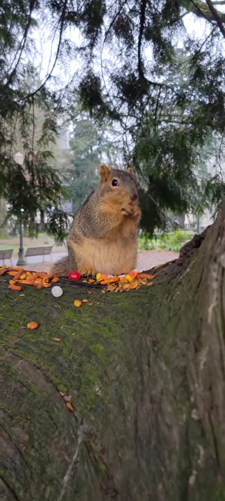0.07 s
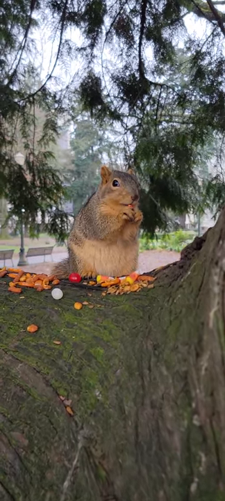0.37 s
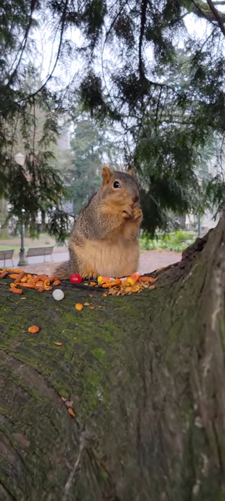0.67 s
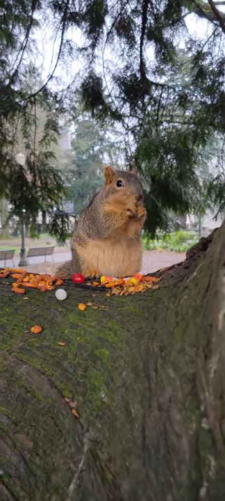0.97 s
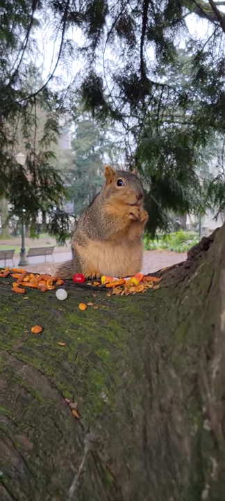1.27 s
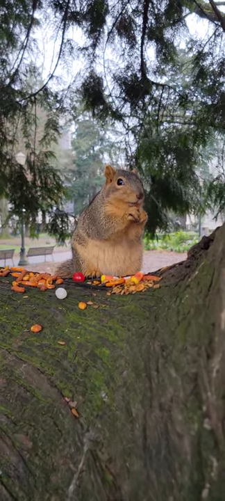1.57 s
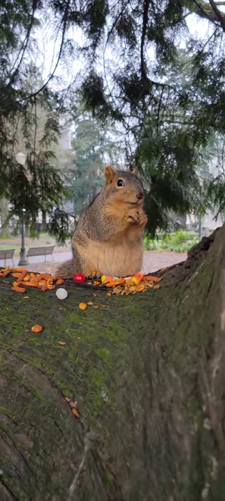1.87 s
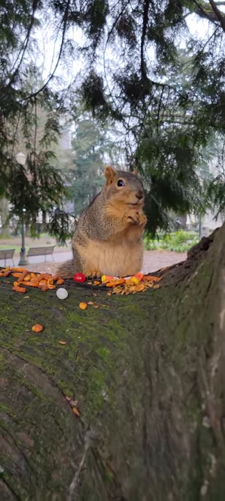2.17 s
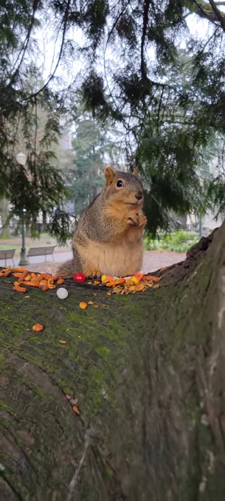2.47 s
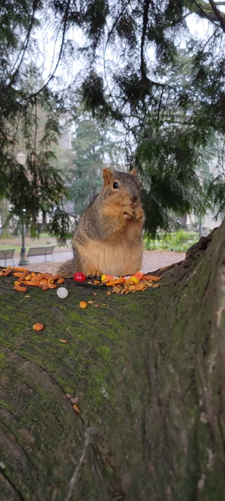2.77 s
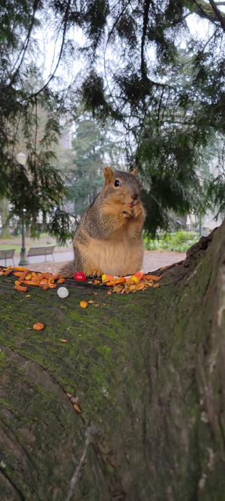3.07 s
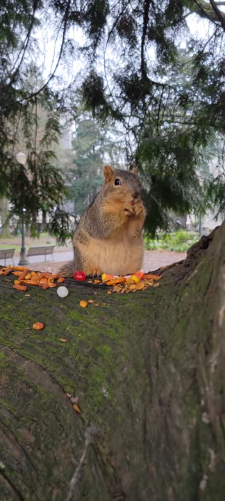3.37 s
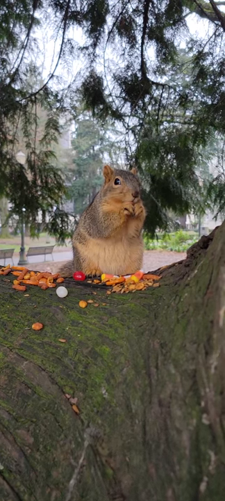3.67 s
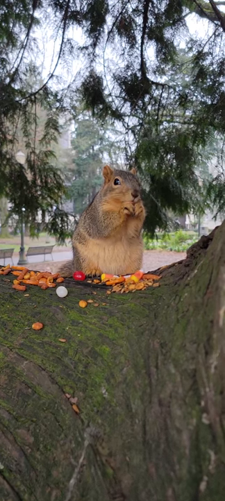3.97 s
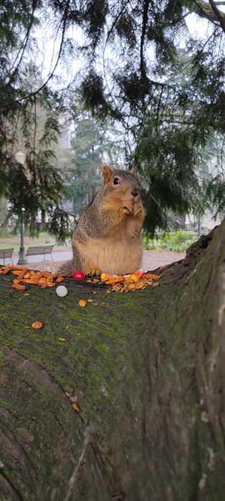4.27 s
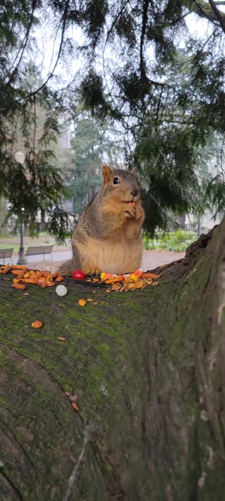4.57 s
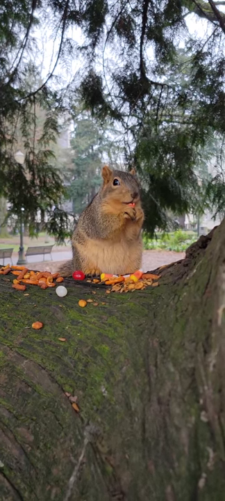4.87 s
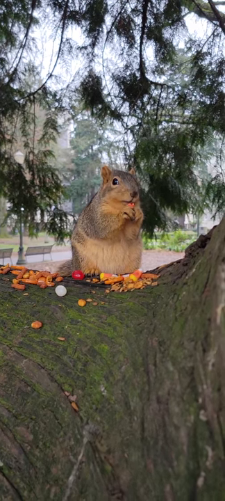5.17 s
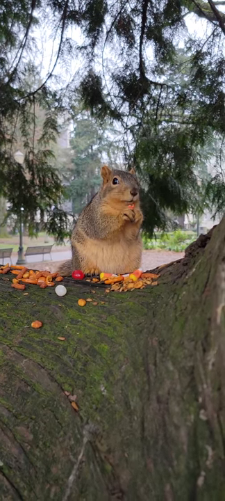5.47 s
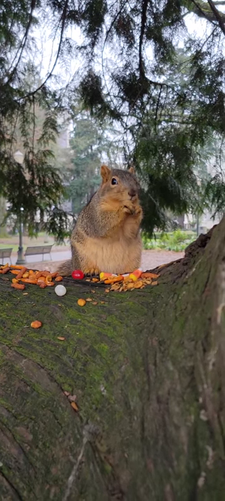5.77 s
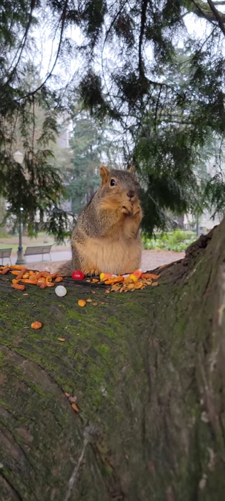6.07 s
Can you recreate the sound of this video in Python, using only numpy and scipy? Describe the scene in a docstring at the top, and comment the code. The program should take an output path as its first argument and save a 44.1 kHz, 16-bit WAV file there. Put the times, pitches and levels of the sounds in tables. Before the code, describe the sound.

A deep rumble of distant traffic fills a town park for the whole six seconds, gently swelling and dipping, with a low engine drone and a wash of tyres that slowly grows. Close by, a squirrel chews with tiny, scattered ticks, and a barely audible high rustle comes about once a second. A few short, soft, hollow notes sound far off between 2.3 and 3.5 seconds, and again from 5.2 to 5.7. From about 4.3 to 5.3 seconds the squirrel gnaws a hard nut in eight sharp, evenly spaced bites, each a crisp crack with a fine crumbling tail. The first four are dry and snapping, the last four a little softer and more hollow. Smaller chewing clicks follow until about 5.6 seconds, and the traffic carries on to the end.

```python
"""Traffic rumble swells and dips around a town park, with an engine drone and slowly growing tyre wash.
Close by, a squirrel on a tree trunk makes tiny chewing ticks. A faint, high rustle comes about once a
second, and soft hollow notes sound far off.
Then the squirrel gnaws a hard nut: eight sharp bites, each two quick fractures with a crumbling tail.
The first bites snap the dry shell, the later ones ring the hollow of mouth and paws."""
import sys
import numpy as np
from scipy import signal
from scipy.fft import rfft, irfft
from scipy.io import wavfile
from scipy.ndimage import uniform_filter1d

SR = 44100
rng = np.random.default_rng(int(sys.argv[2]) if len(sys.argv) > 2 else 0)


def waveform_to_disk(signal):
    """Save audio, clipped to [-1, 1], as 16-bit WAV at the path in sys.argv[1]."""
    frames = np.transpose(np.atleast_2d(signal))
    scaled = np.clip(frames, -1, 1) * 32767
    samples = np.round(scaled).astype(np.int16)
    wavfile.write(sys.argv[1], SR, samples)


N = 274302
T = np.arange(N) / SR


def undb(db):
    """Decibels to gain."""
    return 10 ** (np.asarray(db) / 20)


def unit(x):
    """Scale to rms 1."""
    return x / np.sqrt(np.mean(x ** 2) + 1e-24)


def pan(db):
    """Stereo gains for a left-minus-right level in dB; negative leans right."""
    return undb([[db / 2], [-db / 2]])


def add(out, x, start_s):
    """Mix x into out from start_s on."""
    i = int(np.clip(start_s * SR, 0, N - 1))
    out[..., i:i + x.shape[-1]] += x[..., :N - i]


def band(x, low_hz, high_hz, order=3):
    """Causal band-pass."""
    return signal.sosfilt(signal.butter(order, [low_hz, high_hz], "band", fs=SR, output="sos"), x)


def bins(x):
    """Frequencies of the spectrum of x."""
    return np.arange(x.shape[-1] // 2 + 1) * SR / x.shape[-1] + 1e-3


def along(hz, table):
    """Columns of a table, joined by straight lines over log frequency."""
    points, *columns = np.transpose(table)
    return [np.interp(np.log(hz), np.log(points), c) for c in columns]


def colour(x, table):
    """EQ x through points of freq_hz, gain_db."""
    return irfft(rfft(x) * undb(along(bins(x), table)[0]), x.shape[-1])


def ring(x, modes):
    """Pass x through parallel resonances of freq_hz, width_hz, gain_db."""
    f = bins(x)
    response = sum(undb(db) / (1 + 1j * (f * f - hz * hz) / (f * width)) for hz, width, db in modes)
    return irfft(rfft(x) * response, len(x))


def walk(rate_hz):
    """Smooth random drift with a spread near 1."""
    hold = int(SR / rate_hz)
    steps = np.repeat(rng.standard_normal(N // hold + 1), hold)
    return 1.28 * uniform_filter1d(uniform_filter1d(steps, hold), hold)[:N]


def grain_gains(count, grain_db, cap=4):
    """Random gains for a gritty texture: many small, a few large."""
    return undb(grain_db * np.minimum(rng.exponential(size=count), cap))


def whiten(burst):
    """Flatten a burst's broad spectrum; fade it out between a quarter and half of its length."""
    spectrum = rfft(burst)
    power = uniform_filter1d(np.abs(spectrum) ** 2, 15)
    fade = np.clip(2 - 4 * np.arange(len(burst)) / len(burst), 0, 1)
    return irfft(spectrum / np.sqrt(power + 1e-18), len(burst)) * fade


# Tone of the streets: freq_hz, gain_db
RUMBLE_EQ = [(20, -36), (30, -13.5), (42, -4), (55, 6), (65, 7.5), (78, 9), (90, 2.5), (108, -3), (128, 2),
             (150, -5.5), (185, -9.5), (240, -14), (330, -27.5), (600, -76)]
# Swells and dips of the traffic: time_s, level_db
RUMBLE_LEVELS = [(0, -38), (.5, -35.5), (1.2, -34), (1.95, -34.5), (2.34, -34.5), (2.44, -40), (2.55, -34),
                 (2.85, -36.5), (3, -36.5), (3.12, -34.5), (3.9, -35), (4.65, -33), (5.25, -33), (5.4, -35),
                 (5.9, -30.5), (5.98, -42), (6.1, -32.5)]


def traffic_rumble(drift_db=0.07):
    """Deep street rumble that swells and dips, a little to the right."""
    rumble = unit(colour(rng.standard_normal(N), RUMBLE_EQ))
    rumble /= np.sqrt(uniform_filter1d(rumble ** 2, SR // 4))  # many engines overlap and even out
    level_db = np.interp(T, *np.transpose(RUMBLE_LEVELS)) + drift_db * walk(8)
    return rumble * undb(level_db) * pan(-2.5)


# Pitch and level ride of one engine: time_s, firing_hz, level_db
ENGINE_RIDE = [(0, 103, -38.5), (1.2, 101.5, -42), (2.33, 103, -33), (2.45, 103, -37), (2.98, 108, -44),
               (3.1, 107, -33.5), (3.42, 106, -37.5), (3.899, 103, -38), (4.6, 108, -41.5), (5.1, 101, -41),
               (6.22, 103, -47.5)]


def engine_drone(waver_hz=3, throb_db=2.0, whine_hz=187.5, whine_db=-52):
    """An engine hums at its wavering firing rate, with a faint, low whine above it."""
    time_s, *columns = np.transpose(ENGINE_RIDE)
    firing_hz, level_db = (np.interp(T, time_s, c) for c in columns)
    phase = 2 * np.pi * np.cumsum(firing_hz + waver_hz * walk(22.007)) / SR
    drone = unit(np.sin(phase) * undb(throb_db * walk(19)))
    whine = unit(ring(rng.standard_normal(N), [(whine_hz, 3.4, 0)]))
    return (drone * undb(level_db) + whine * undb(whine_db)) * pan(-2.5)


# Tone of the far tyres: freq_hz, gain_db
WASH_EQ = [(150, 3), (280, -2), (420, -4.5), (520, -0.5), (900, 0), (1300, 0), (1600, -7), (2100, -13),
           (2700, -14.5), (4000, -26), (7500, -40.5), (9400, -50), (10400, -63.5), (12500, -56),
           (15600, -63), (16100, -78.5)]
# Their stereo image: freq_hz, left_minus_right_db, correlation
WASH_IMAGE = [(200, -1.5, 0.75), (389, -4.5, 0.4), (516, -6, 0.33), (1030, -2, -0.13), (1870, -2.5, 0.23),
              (2120, 0.5, -0.11), (7000, 1.5, -0.08), (9300, 8, -0.73), (15000, 17, -0.25)]


def tyre_wash(start_db=-40.5, rise_db_per_s=0.4451, flicker_db=0.66, hiss_follow=0.5):
    """Diffuse wash of far tyres; the mids grow steadily while the faint hiss above stays calmer."""
    mid, side = rfft(rng.standard_normal((2, N)))
    pan_db, correlation = along(bins(T), WASH_IMAGE)
    sign = np.array([[1], [-1]])
    pair = mid * np.sqrt(1 + correlation) + sign * side * np.sqrt(1 - correlation)
    wash = unit(colour(irfft(pair * undb(sign * pan_db / 2), N), WASH_EQ))
    hiss = colour(wash, [(1500, -24.5), (2600, -9.5)])
    wash_db = start_db + rise_db_per_s * T
    hiss_db = np.mean(wash_db) + hiss_follow * (wash_db - np.mean(wash_db))
    return (wash - hiss) * undb(wash_db + flicker_db * walk(9)) + hiss * undb(hiss_db)


# The five layers of a crack (knock, hollow, shell, snap, fizz):
# low_hz, high_hz, left_minus_right_db, dry_bite_db, hollow_bite_db
CRACK_LAYERS = [(900, 1650, -11, -11.5, -10.5), (1900, 3100, -10.5, -8.5, 11.5),
                (3130, 6240, -6, 1.5, -10.5), (5950, 10300, 0.5, -7, -5.5), (10000, 15000, -8.5, -12, 3.5)]
# Resonances of the hollow of mouth and paws: pitch_ratio, width_hz, gain_db
HOLLOW_MODES = [(0.85, 288.5, -4.5), (0.995, 165, 7.5)]
# Resonances of the nut: freq_hz, width_hz, gain_db
NUT_MODES = [(3540, 260, 13), (4320, 280, 10), (4770, 190, 10.5), (5370, 220, 6.5), (6020, 240, 12.5),
             (6480, 190, 9), (7150, 300, 12), (7700, 380, 7), (8250, 220, 4.5), (9900, 450, 1),
             (10900, 600, 3), (11800, 300, 4), (12400, 280, 5), (15080, 500, 8.5)]


def crack(level_db, hollowness, boosts_db, hollow_hz, piece_modes, crumble_s, tail_db, raw_db=-20):
    """One fracture: the jaw's jolt rings the hollow; a rush of tiny breaks rings nut and loose piece."""
    t = np.arange(2048) / SR
    breaks = rng.choice([-1, 1], len(t)) * grain_gains(len(t), grain_db=4)
    attack = 1 - np.exp(-t / 0.00089)
    tail = undb(tail_db) * np.exp(-t / 0.0045)  # scattered by the bark
    rush = whiten(breaks * attack * (np.exp(-(t / crumble_s) ** 2) + tail))
    jolt = unit(1. * (t == 0)) + 0.36 * unit(rush)  # a slightly roughened impulse
    hollow = ring(jolt, [(ratio * hollow_hz, width, db) for ratio, width, db in HOLLOW_MODES])
    nut = ring(rush, list(NUT_MODES) + piece_modes) + undb(raw_db) * rush
    knock_db, snap_db, fizz_db = boosts_db
    bodies = [(rush, knock_db), (hollow, 0), (nut, 0), (nut, snap_db), (nut, fizz_db)]
    out = 0
    for (body, boost_db), (low_hz, high_hz, pan_db, dry_db, hollow_db) in zip(bodies, CRACK_LAYERS):
        layer_db = level_db + boost_db + np.interp(hollowness, [0, 1], [dry_db, hollow_db])
        out = out + unit(band(body, low_hz, high_hz, order=4)) * undb(layer_db) * unit(pan(pan_db))
    return out * np.sqrt(0.0049 / t[-1])  # as much energy as that level held for about 5 ms


def chip(level_db, hollowness=0, snap_db=0, fizz_db=0):
    """A small bit is scraped off, with only a broad, weak ring of its own."""
    piece_modes = [(rng.uniform(3500, 6100), 1500, 12), (rng.uniform(10000, 22000), 3000, 4.5)]
    return crack(level_db, hollowness, (0, snap_db, fizz_db), hollow_hz=2570, piece_modes=piece_modes,
                 crumble_s=0.0029, tail_db=-22, raw_db=-0.5)


# Chewing cues: start_s, level_db, hollowness (0-1), snap_boost_db, fizz_boost_db
CHEW_CUES = [(.2768, -68, .3, -1, -12), (1.1857, -71, .3, -4, -4), (1.2, -72, .3, 0, -4),
             (1.645, -75, .3, -2, 0), (1.6581, -69, 0.2, -1, 0), (1.8332, -72, 0.2, -2, 0),
             (1.8647, -70, 0.2, 6, -5), (1.873, -73, .2, 3, -3), (1.9584, -70, .3, 1, -7),
             (2.2478, -75, 0.5, 3, -5), (2.4723, -73, 0.4, -4, -1), (2.5262, -71, .3, 0, -3),
             (3.2984, -73, .3, -2, -3), (3.897, -65, .3, 5, -13), (4.119, -68, 0.38, 2, -12),
             (4.135, -70, .3, 4, -15), (4.34, -61, 0.4, 2, -4), (4.507, -51, 0.3, -5, -15),
             (4.56, -47, 0.3, -4, 1), (4.689, -52, 0.2, 0, 2), (4.7735, -48.5, 0.03, -12, -9),
             (4.86, -58, 0.5, -7, 7), (4.954, -66, .3, 0, -3), (5.045, -65, 0.2, 3, -3),
             (5.09, -67, 0.2, 2, -4), (5.1895, -45.5, 0.7, -2.5, -6.5), (5.198, -47, 0.6, 3.5, 2),
             (5.2535, -63.5, .1, 1, -3.5), (5.459, -52, 0.5, -4, -1), (5.47, -66, .3, -1, 3),
             (5.486, -72, .3, -2, 5), (5.5187, -48, 0.1, -6.5, -7), (5.523, -64, .1, -3, 2),
             (5.531, -44, 0.4, -11, -11), (5.536, -46, 0.1, -17, -11), (5.632, -48, 0.17, -2, -21),
             (6.09, -61.5, .3, 6, -12)]


def chewing(crumb_count=22, crumb_db=-78):
    """Teeth tick small chips off the nut; fainter crumbs break at random moments."""
    out = np.zeros((2, N))
    for start_s, *tick in CHEW_CUES:
        add(out, chip(*tick), start_s)
    for when, size in rng.random((crumb_count, 2)):
        add(out, chip(crumb_db + 2 * np.log(size + .1)), when * N / SR)
    return out


# Rustle cues: peak_s, level_db
RUSTLE_CUES = [(.635, -83), (1.63, -84), (2.64, -84), (3.63, -80)]


def rustles(half_length_s=0.024, ring_hz=9100, width_hz=700, raw_db=-1):
    """Soft, grainy, high rustles, a second apart."""
    grains = rng.standard_normal(N) * grain_gains(N, grain_db=3)
    ringing = ring(grains, [(ring_hz, width_hz, 0)])
    rustle = unit(band(ringing + undb(raw_db) * grains, 5800, 9600))
    swells = sum(undb(db) * np.exp(-((T - peak_s) / half_length_s) ** 2 / 2) for peak_s, db in RUSTLE_CUES)
    return rustle * swells


# Distant hollow notes: peak_s, pitch_hz, level_db, half_length_s, waver_hz
NOTE_CUES = [(2.312, 605, -42, 0.016, 79), (2.536, 512, -46, 0.0091, 32), (3.044, 560, -41, 0.013, 31),
             (3.248, 611, -46.5, 0.017, 25), (3.444, 520, -44.5, 0.0095, 20), (5.235, 537, -42, 0.011, 12),
             (5.408, 510, -47, 0.02, 12.2), (5.542, 423, -44, .014, 29), (5.699, 500, -43, 0.016, 26)]


def far_notes(rough_db=3.0):
    """Short, rough, wavering notes from across the park, with only their strongest resonance left."""
    out = 0
    for peak_s, pitch_hz, level_db, half_length_s, waver_hz in NOTE_CUES:
        phase = 2 * np.pi * np.cumsum(pitch_hz + waver_hz * walk(120)) / SR
        note = np.sqrt(2) * np.sin(phase) * unit(undb(rough_db * walk(170)))
        out = out + note * undb(level_db) * np.exp(-((T - peak_s) / half_length_s) ** 2 / 2)
    return out * pan(-6)


# Level ride of the fine crumbling: time_s, level_db
SCRAPE_LEVELS = [(4.25, -97), (4.45, -85), (5.35, -83), (5.65, -86.5), (5.85, -98)]


def scraping(flicker_db=1.0):
    """Fine, grainy crumbling as the nut turns against the teeth."""
    grains = rng.standard_normal(N) * grain_gains(N, grain_db=2, cap=5)
    time_s, level_db = np.transpose(SCRAPE_LEVELS)
    gain = undb(np.interp(T, time_s, level_db) + flicker_db * walk(40))
    gate = (T > time_s[0]) & (T < time_s[-1])
    return unit(band(grains, 7000, 15000)) * gain * gate


# Bite cues: start_s, level_db, hollowness (0-1), knock_boost_db, snap_boost_db, fizz_boost_db, hollow_hz,
# shell_hz, shell_db, splinter_hz, fracture_gap_s, second_fracture_db, crumble_s, tail_db
BITE_CUES = [(4.2945, -33.5, 0.06, 6, -4.5, -5, 2800, 4180, 20, 13900, 0.0029, -5, 0.0017, -21),
             (4.4414, -27, 0.01, -3, 0, 8, 2930, 4760, 14, 12150, 0.0028, -0.5, 0.0024, -22),
             (4.5652, -33, 0, 5, 2.5, 5, 2550, 5470, 17, 12450, 0.0014, 2.5, 0.0025, -11),
             (4.6956, -28, 0.24, 5.5, -1.5, -2.5, 2760, 4370, 12, 10500, .0041, -3.5, 0.0034, -22),
             (4.8695, -37.5, 0.93, 0, -3, 1.5, 2690, 7000, 18, 12000, 0.0031, -3, 0.0021, -26),
             (5.0155, -35.5, 0.95, 2, 4.5, 2.5, 2640, 6150, 14, 12500, .0022, 6.5, 0.0026, -22),
             (5.1743, -39, 0.75, 9.5, 9.5, 0.5, 2460, 8800, 10.5, 10700, 0.0028, 4.5, 0.0026, -19),
             (5.321, -36.5, 0.77, 5, -1, 10.5, 2680, 7700, 11.5, 12100, .00147, 8, 0.0018, -22)]


def bites(dulling_db=-10.5, flake_db=-28, flake_window_s=0.017):
    """Each bite breaks the nut in two steps, rings the broken shell and a splinter, and sheds two flakes."""
    out = np.zeros((2, N))
    for (start_s, level_db, hollowness, knock_db, snap_db, fizz_db, hollow_hz,
         shell_hz, shell_db, splinter_hz, gap_s, second_db, crumble_s, tail_db) in BITE_CUES:
        piece_modes = [(shell_hz, 380, shell_db), (splinter_hz, 450, 11)]
        timbre = hollow_hz, piece_modes, crumble_s, tail_db
        add(out, crack(level_db, hollowness, (knock_db, snap_db, fizz_db), *timbre), start_s)
        # in a hollow bite the teeth close on the second fracture and muffle its treble
        dull_db = dulling_db * hollowness
        muffled_db = knock_db, snap_db + dull_db, fizz_db + dull_db
        add(out, crack(level_db + second_db, hollowness, muffled_db, *timbre), start_s + gap_s)
        for delay_s in flake_window_s * rng.random(size=2):
            add(out, chip(level_db + flake_db), start_s + gap_s + delay_s)
    return out


def in_tree(sound, left_lag_s=8.6e-5, tail_db=-45, decay_s=0.03):
    """The sound reaches the left microphone later; branches throw back a short, faint tail."""
    left, right = sound
    left = irfft(rfft(left) * np.exp(-2j * np.pi * bins(left) * left_lag_s), N)
    t = T[:SR // 4]
    branches = rng.standard_normal((2, len(t))) * np.exp(-t / decay_s) * (1 - np.exp(-t / .004))
    branches /= np.sqrt(np.sum(branches ** 2, axis=1, keepdims=True))
    tail = signal.fftconvolve(right[None], branches, axes=1)[:, :N]
    return np.array([left, right]) + undb(tail_db) * tail


def scene():
    """The town as a bed, the squirrel close in front, and the faint rustles."""
    town = traffic_rumble() + engine_drone() + tyre_wash() + far_notes()
    squirrel = in_tree(chewing() + bites()) + scraping()
    return town + squirrel + rustles()


def record(dry, top_hz=16100):
    """The phone cuts the top with a steep low-pass."""
    return signal.sosfilt(signal.ellip(8, .2, 70, top_hz, fs=SR, output="sos"), dry)


dry = scene()
out = record(dry)
waveform_to_disk(out)
```